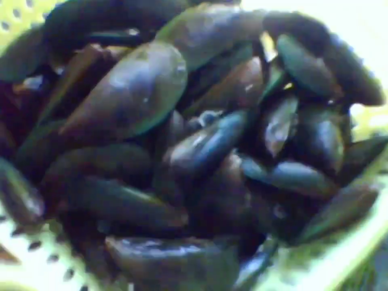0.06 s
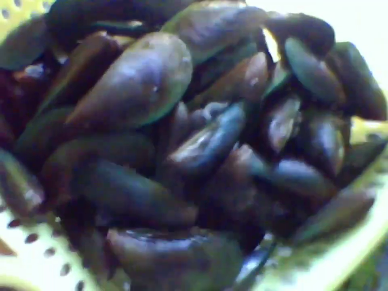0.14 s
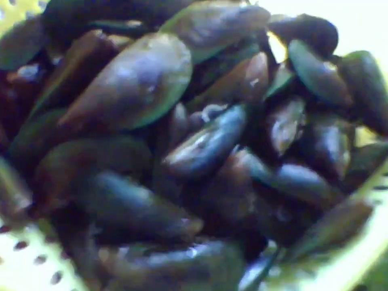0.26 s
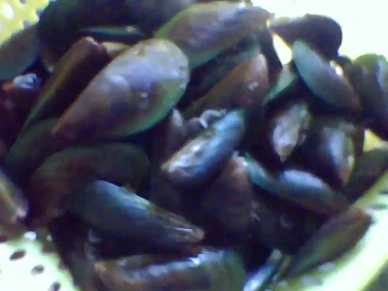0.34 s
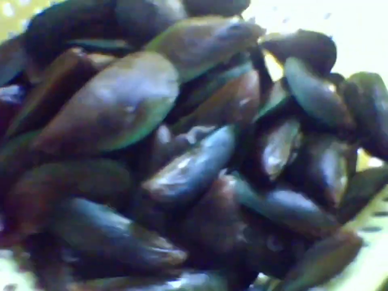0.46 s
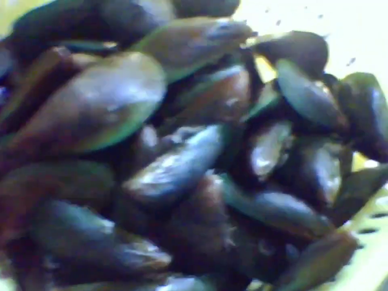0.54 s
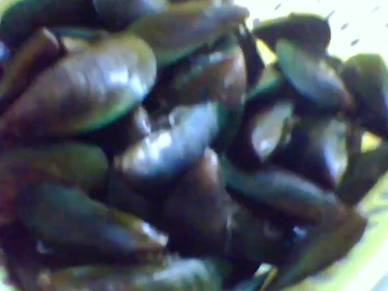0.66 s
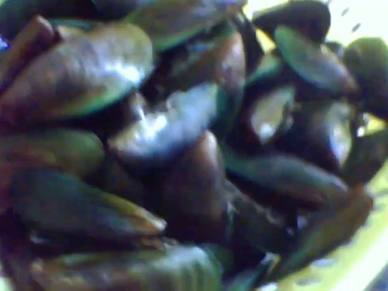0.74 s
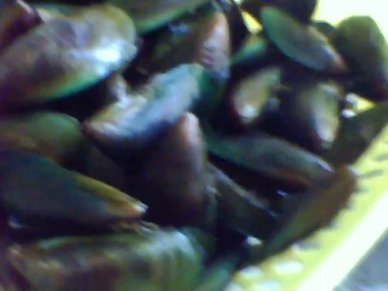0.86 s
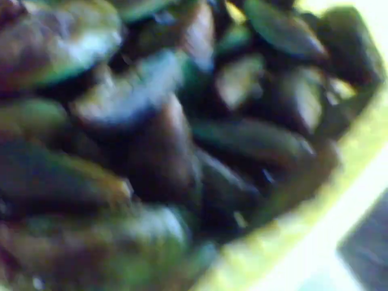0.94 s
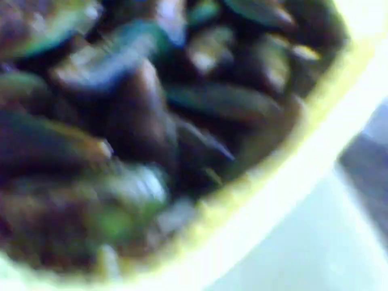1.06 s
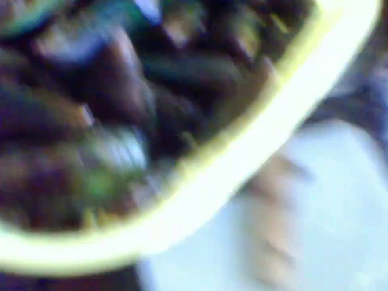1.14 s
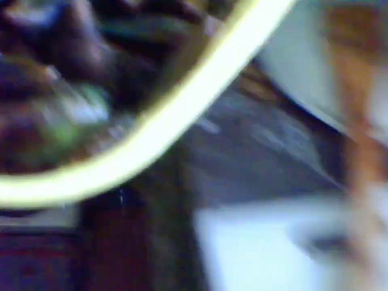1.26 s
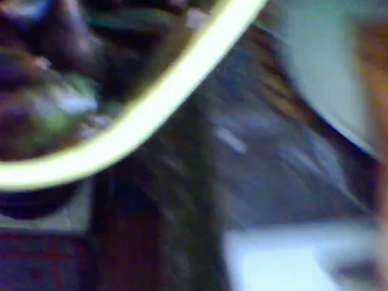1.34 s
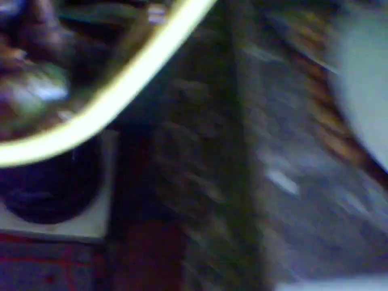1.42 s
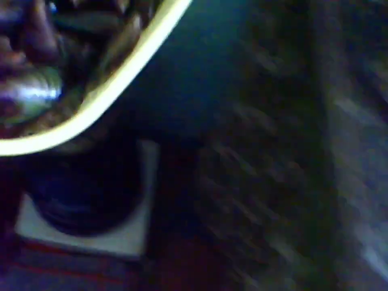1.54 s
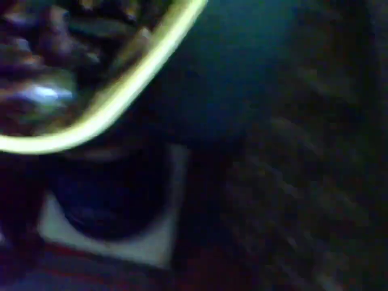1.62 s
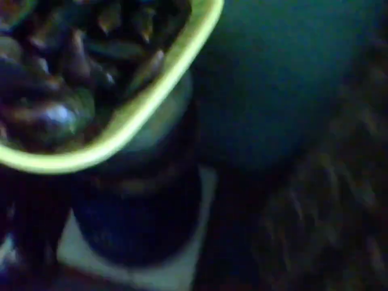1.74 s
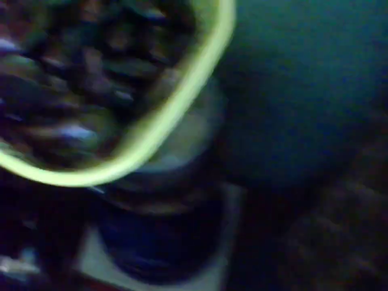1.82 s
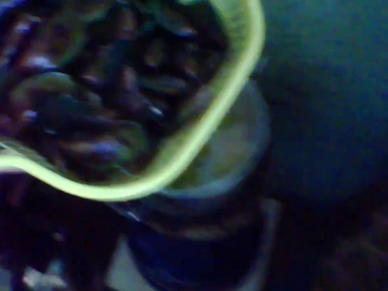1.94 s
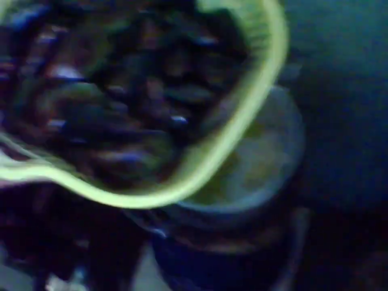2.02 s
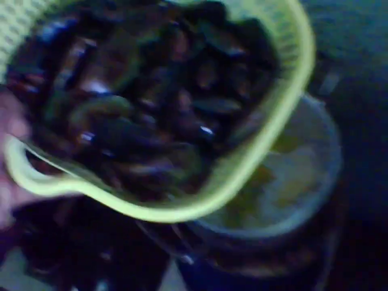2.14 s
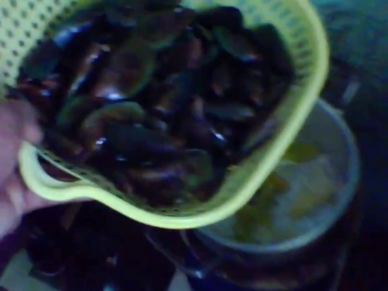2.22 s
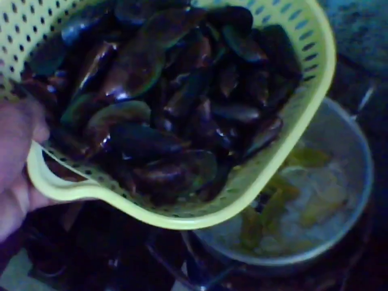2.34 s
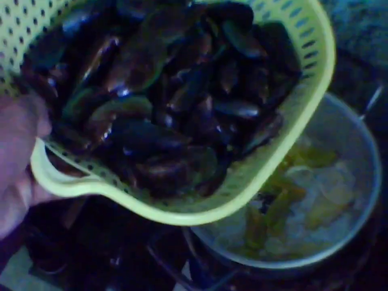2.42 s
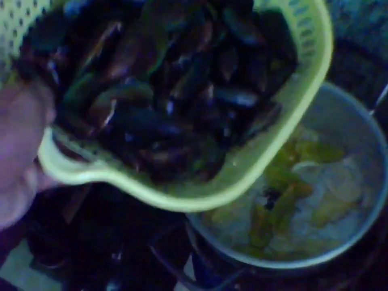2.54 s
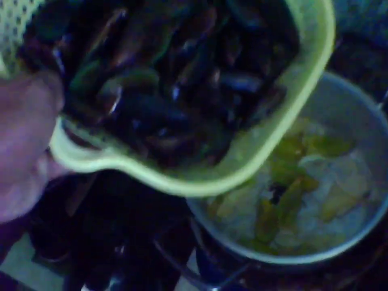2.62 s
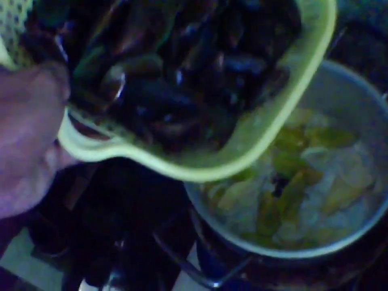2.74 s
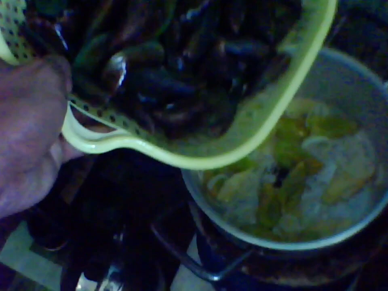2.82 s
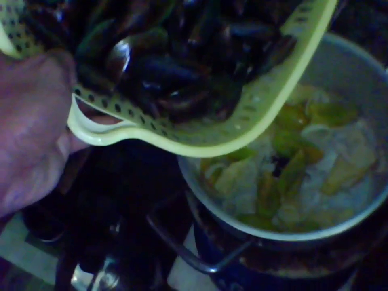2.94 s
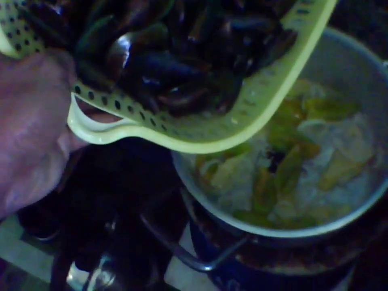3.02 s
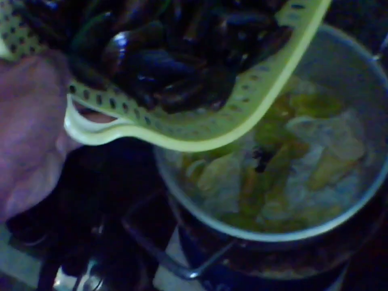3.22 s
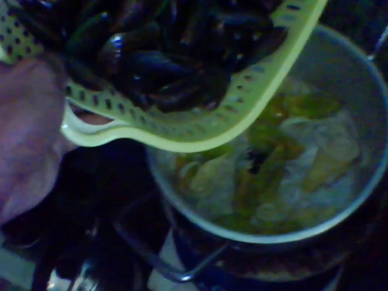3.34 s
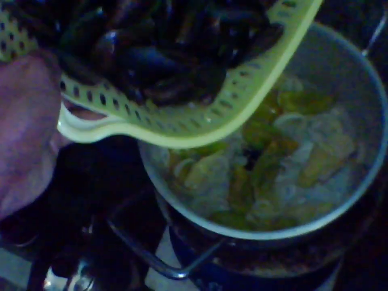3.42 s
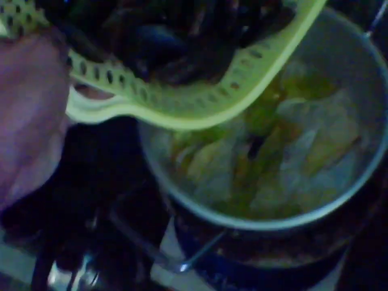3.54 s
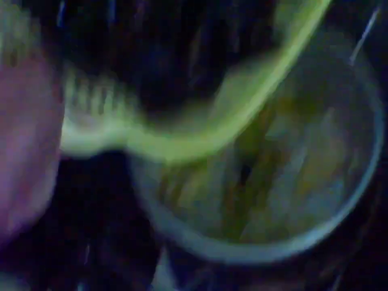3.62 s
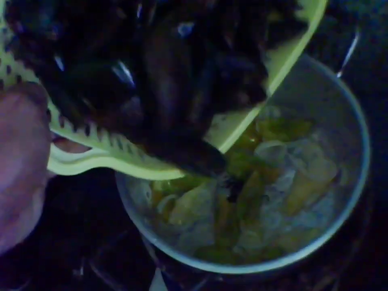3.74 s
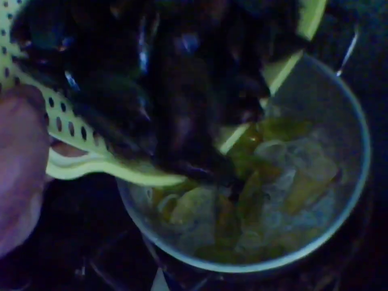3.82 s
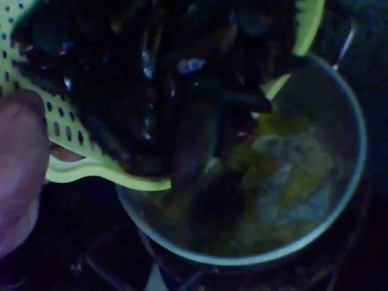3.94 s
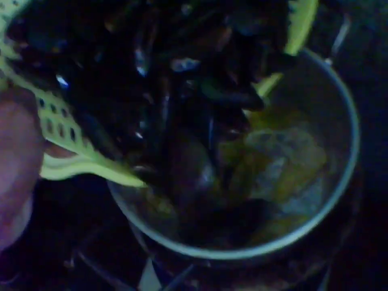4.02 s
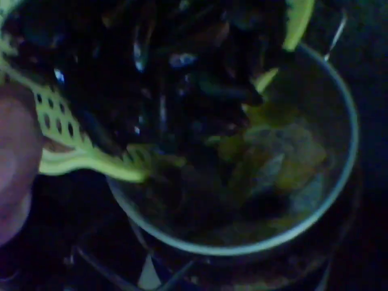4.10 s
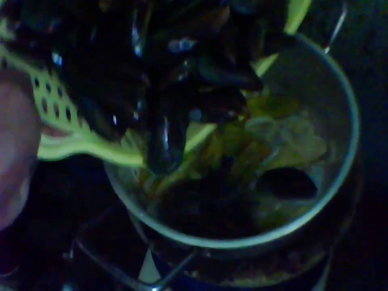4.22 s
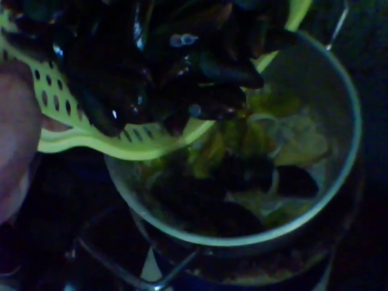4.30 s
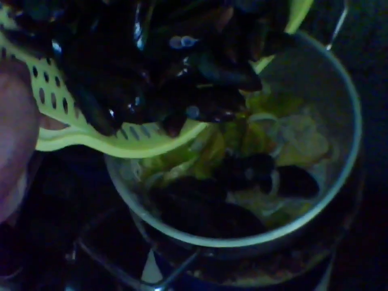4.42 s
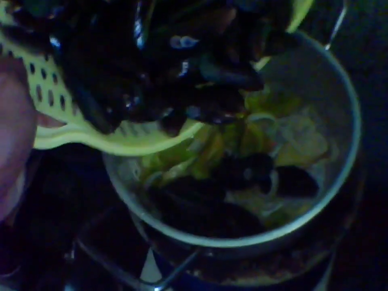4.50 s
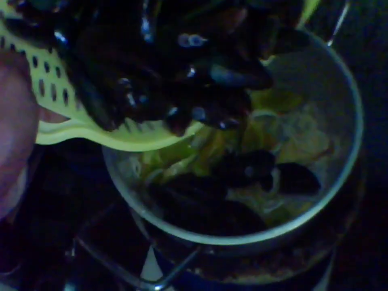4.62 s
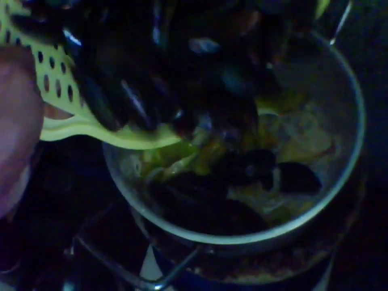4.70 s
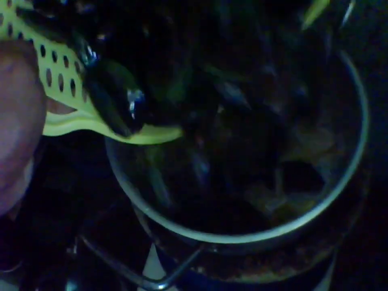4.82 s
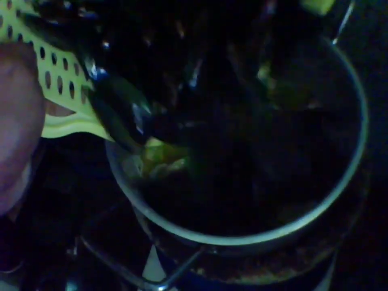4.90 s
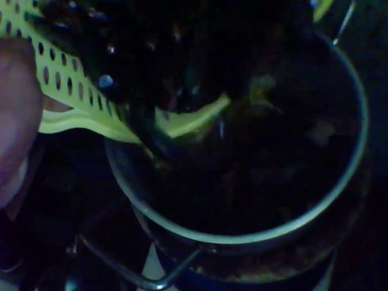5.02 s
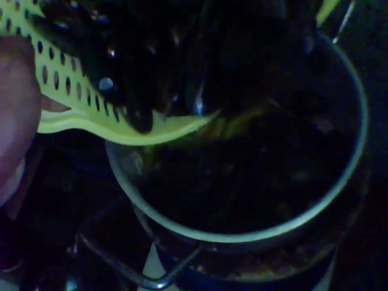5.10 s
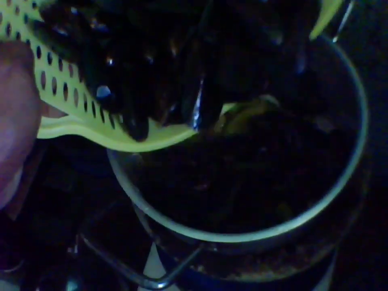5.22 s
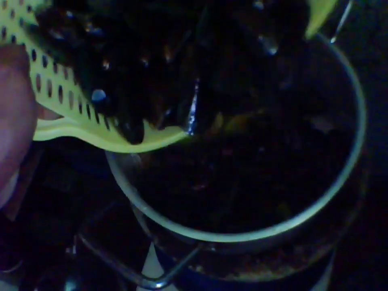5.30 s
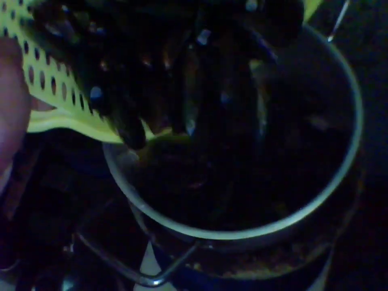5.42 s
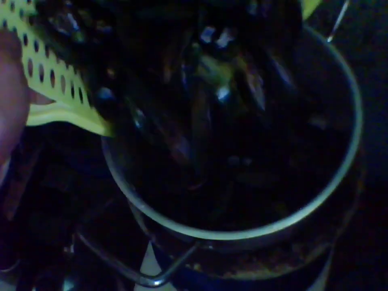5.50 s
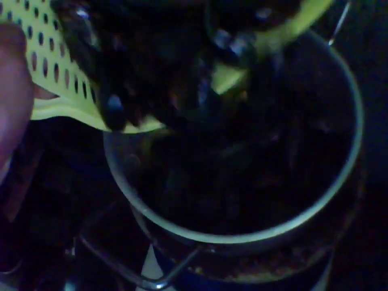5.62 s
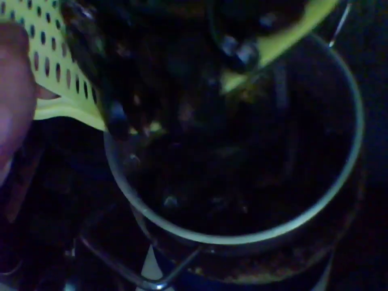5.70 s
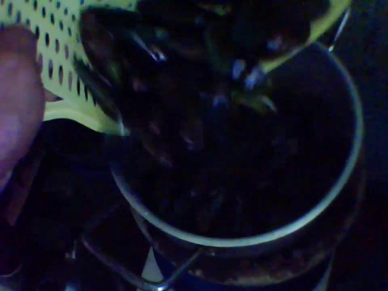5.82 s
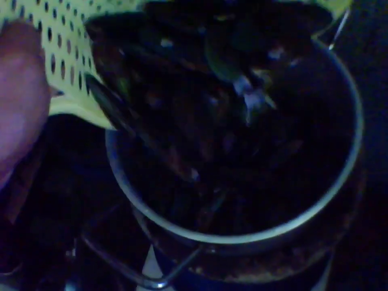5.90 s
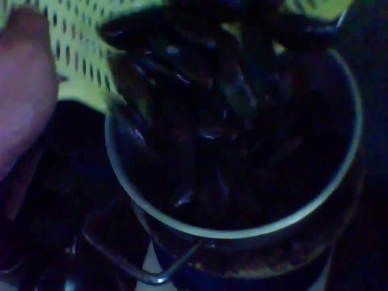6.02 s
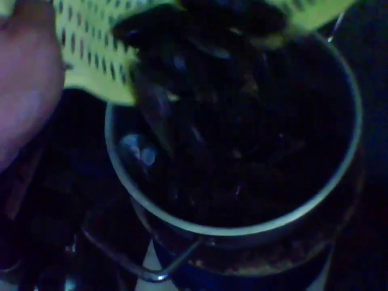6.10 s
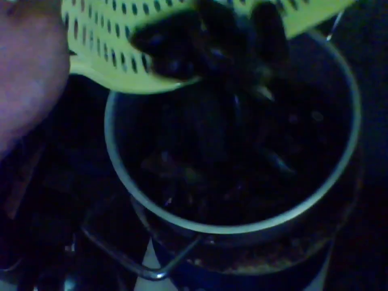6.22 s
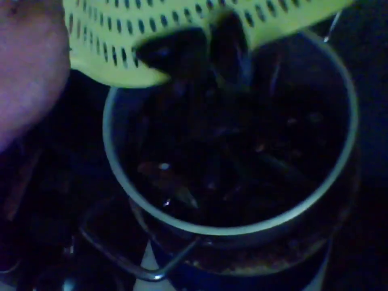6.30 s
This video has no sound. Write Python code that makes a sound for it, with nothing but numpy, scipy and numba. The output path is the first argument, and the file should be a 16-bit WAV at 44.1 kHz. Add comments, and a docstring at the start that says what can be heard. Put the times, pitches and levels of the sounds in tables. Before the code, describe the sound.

A metal pot simmers softly over kitchen room noise and a faint electrical hum. A few mussel shells clack lightly in a plastic colander. The shells then slide out and tumble into the pot, a dense clatter of hollow knocks, dull thuds and sharp clicks, while the bubbling and sizzling grow. The microphone is just above the pot, and the heaviest landings briefly distort.

```python
"""A few mussel shells clack over a simmering metal pot, then the rest slide in from a plastic colander.
Each knock thuds the pot floor, rings its air and wall and cracks in the treble; small shells rattle between.
Underneath, the pot bubbles and sizzles nearer and nearer over kitchen noise and a mains hum.
The microphone is held just above, so the loudest knocks overload the recorder."""
import sys
import numpy as np
from scipy import signal
from scipy.fft import rfft, irfft, next_fast_len
from scipy.io import wavfile
from scipy.ndimage import uniform_filter1d
from numba import njit

SR = 44100
rng = np.random.default_rng(int(sys.argv[2]) if len(sys.argv) > 2 else 0)


def bounce(signal):
    """Save signal as a 16-bit WAV file at the path given by the first command-line argument."""
    frames = np.transpose(np.atleast_2d(signal))
    limited = np.clip(frames, -1, 1)
    pcm = np.round(limited * 32767).astype(np.int16)
    wavfile.write(sys.argv[1], SR, pcm)


N = 280035

# Colour of the room tone. Each row: frequency in Hz, relative level in dB.
KITCHEN_SPECTRUM = [(15, -51.5), (25, -15.5), (128, -6.5), (170, -3), (206, -4.5), (355, -2), (673, -4.5),
                    (1030, -9), (1660, -27.5), (3710, -8.5), (7200, -15.5), (9360, -21), (15800, -120)]
# Fader ride of the mains hum. Each row: time in seconds, level in dB.
HUM_RIDE = [(0, -59), (1.1, -68.5), (2.1, -57.5), (4.5, -57), (5.4, -62.5), (6.35, -62)]
# Partials of the hum. Each row: multiple of HUM_HZ, relative level in dB.
HUM_PARTIALS = [(1, -1), (1.5, -11.5), (3, -12)]
# The simmer as the microphone nears and cold shells hit the pot.
# Each row: time in seconds, bubbling level in dB, sizzle level in dB.
SIMMER_RIDE = [(0, -41.5, -51.5), (.44, -49, -53), (1.3, -50, -55), (1.8, -45.5, -51.5), (2.3, -46, -49.5),
               (2.75, -45, -47.5), (3.4, -46.5, -46), (3.6, -48.5, -48), (3.96, -41, -47),
               (4.2, -39.5, -42), (4.35, -38, -45.5), (4.42, -35.5, -35), (4.8, -38, -38.5),
               (5.1, -27, -31), (5.33, -39.5, -47), (5.44, -36.5, -36.5), (6.35, -30, -37.5)]
# Air in the pot under the simmer. Each row: centre in Hz, width in Hz, relative level in dB.
AIR_BANDS = [(588, 68, 7), (637, 31, 5.5), (752, 64, -3.5), (890, 23.4, 1.5), (980, 78, 2.5),
             (1172, 203, -4.5), (1323, 85, -2.5), (1877, 326, -6), (2480, 336, -9.5)]
# Colour of the sizzle. Each row: centre in Hz, width in Hz, relative level in dB.
SIZZLE_BANDS = [(4060, 840, 15), (5100, 1200, 2), (6140, 1000, -8)]
# What a knock rings: the pot's floor, air and wall, and the shell itself.
# Each row: pitch in Hz, relative level in dB, time to fade 60 dB in seconds.
FLOOR_MODES = [(583.5, 1, 0.056), (622.3, -4.5, 0.091), (682.5, -3, 0.087), (739, -7, 0.098)]
AIR_MODES = [(820.4, 0, 0.05), (986.6, -2.5, 0.076), (1076.6, -7.5, 0.081), (1185.2, 1.5, 0.036),
             (1244, -4.5, 0.041), (1329, -1, 0.031)]
WALL_MODES = [(1635, -8, 0.065), (1766, 5.5, 0.043), (1925, -2.5, 0.012), (2240, -20.5, 0.023),
              (2302, 5.5, 0.026), (2430, 7.5, 0.011), (2640, -5, 0.032)]
SHELL_MODES = [(2870, -8, 0.019), (3260, -4, 0.02), (3685, 5, 0.012), (3988, 6, 0.015), (4295, 3, 0.012),
               (4610, 4.5, 0.0074), (5163, -2.5, 0.015), (5900, -5.5, 0.0064), (6335, -2, 0.0098),
               (6560, -16.5, 0.018)]
# Light ticks of shell tip on shell tip. Each row: start in seconds, level in dB, pitch in Hz.
TIP_TICKS = [(1.628, -28.5, 2200), (2.599, -32, 5600), (3.079, -32, 4680), (3.406, -27, 5100)]
# Dull bumps of the colander and soft landings. Each row: start in seconds, level in dB, pitch in Hz.
SOFT_BUMPS = [(0.234, -33, 288), (0.25, -27, 295), (4.076, -31, 355), (4.102, -24.5, 343),
              (4.214, -25, 330), (4.235, -19, 315), (4.406, -21.5, 340), (5.175, -29.5, 426),
              (5.293, -31, 338), (5.514, -33, 415), (5.583, -17, 424), (5.669, -15.5, 425),
              (6.088, -18.5, 398)]
# Small shells sliding over each other. Each row: time in seconds, base level in dB, base brightness in dB.
RATTLE_RIDE = [(3.55, -60, -17), (3.7, -44, -14), (3.96, -49.5, -36.5), (4.7, -45, -5.5),
               (4.83, -38.5, -11), (4.89, -20, -24), (5.02, -28.5, -21.5), (5.13, -32, -18),
               (5.3, -45, -7.5), (5.4, -44.5, -4.5), (5.539, -45, -5), (5.68, -29, -18), (5.8, -36, -14.5),
               (6.0, -44.5, -8.5), (6.18, -32, -11), (6.35, -38.5, -12)]
# The featured shell knocks. Each row: start in seconds, pot ring level in dB,
# thud and crack in dB against that ring, favoured pitch in Hz.
SHELL_KNOCKS = [(.041, -34, -20, -20, 970), (.103, -28.5, -12, -8, 1130), (.166, -28, -17, -3, 993),
                (.178, -26, -22, -6, 1030), (.251, -33, -19, 3, 980), (2.458, -27, -18, -17, 891),
                (3.174, -22.5, -11, -23, 1000), (3.654, -27, -19, -4, 964), (3.7916, -18, -22, -18, 1170),
                (3.8065, -19, -31, -4.5, 1116), (3.8136, -18, -22, -19, 1040),
                (3.8404, -20.5, -24, -3, 1060), (3.882, -17.5, -22, -13.5, 1150), (3.913, -22, -28, 0, 980),
                (3.9648, -15, -24, -14, 1150), (4.0772, -10.5, -14, -18.5, 1070),
                (4.0955, -11, -15, -21.5, 1010), (4.1798, -25, -6, -6, 1200), (4.2151, -29, -5, -18, 1220),
                (4.2346, -8.5, -1.5, -16, 1330), (4.2523, 0.5, -6.5, -15, 1240),
                (4.2679, -16, -9, -24, 1300), (4.3096, -16.5, -7.5, -14, 1230),
                (4.4064, -21, -2.5, -10.5, 1230), (4.4487, -24.5, -4, -10, 1010),
                (4.5076, -18.5, -18, -16, 1320), (4.5174, -19.5, -4.5, -24, 1320),
                (4.5346, -9, -16, -28, 1300), (4.7506, -24.5, -8, -6, 1290), (4.7754, -25, -6, 0, 1090),
                (4.7955, -21.5, -13, 1, 1320), (4.8376, -20, -25, 2, 1130), (4.8516, 4, -17, -16.5, 980),
                (4.8636, -11, -11, -21, 886), (4.8682, -6, -10, -10, 980), (4.8736, -3, -15, -22, 1250),
                (4.885, 6.5, -21, -10, 1320), (4.8977, 6.5, -9.5, -17, 1140), (4.9207, 6.5, -17, -21, 1180),
                (4.9334, -5, -14, -2, 1130), (4.9444, -7, -6, -19, 1230), (4.9614, -10.5, -14, 1, 867),
                (4.9691, -4, -9, -12.5, 1160), (4.9809, -4, -8, -14, 1260), (5.0034, -4, -14, 0, 1080),
                (5.009, 3.5, -7.5, -19, 1340), (5.0249, 0.5, -13, -12.5, 821),
                (5.0424, -3.5, -12, -25, 904), (5.0693, -9.5, -12, -14, 1280),
                (5.0914, -10.5, -5.5, -10, 1220), (5.1076, -9.5, -7, -10.5, 1270),
                (5.1274, -15.5, -5.5, -19, 1200), (5.1482, -12.5, -5, -13.5, 1190),
                (5.1634, -5.5, -9.5, -13, 1260), (5.1911, -14, -7.5, -19, 1240),
                (5.2382, -14.5, -25, -11, 993), (5.2613, -10.5, -18, -3, 1230),
                (5.2823, -14.5, -6, -16, 1290), (5.2946, -11.5, -2.5, -10, 1190),
                (5.3144, -13, -14, -17, 985), (5.4555, -22.5, -26, -17.5, 1190),
                (5.4965, -12.5, -9.5, -2.5, 960), (5.5143, -17.5, -0.5, -5.5, 1280),
                (5.5264, -16, -14, -14, 969), (5.5725, -8.5, -11, -3.5, 1170), (5.5824, -6.5, -5, -37, 970),
                (5.6304, -13.5, -10, -20, 853), (5.6389, -4, -12, -18, 1180), (5.6623, -7.5, -3, -8, 1210),
                (5.6708, -7, -6.5, 1, 1130), (5.6978, -10.5, -4, -7, 1240), (5.716, -8, -10, -5, 1130),
                (5.7319, -9.5, -23, -9, 834), (5.7492, -8.5, -19, -8.5, 1186),
                (5.7999, -19, -10, -20, 1170), (5.8235, -11, -25, -14, 1120), (5.8597, -18, -6, -17, 1204),
                (5.883, -7, -13, -14, 1120), (5.898, -2, -14.5, -11.5, 1200), (5.9384, -17, -4, -5, 1200),
                (5.9575, -13.5, -11, -9.5, 1170), (6.0159, -15, -10, 1.5, 1210),
                (6.047, -14.5, -16, -16, 1170), (6.086, -4.5, -14, -11, 845),
                (6.136, -10, -12.5, -5.5, 1170), (6.15, -11.5, -24, -9, 956), (6.1794, -15, -8, -15, 1170),
                (6.2163, -16, -4, -13, 960), (6.2506, -12, -12, -13, 1060),
                (6.2758, -10.5, -10.5, -13, 1090), (6.2949, -17, -6, 3.5, 1270)]
# Overloads on the heaviest landings. Each row: start in seconds, length in seconds, level in dB.
OVERLOADS = [(4.8988, 0.0084, -0.5), (4.9273, 0.0106, -3.5), (5.0102, 0.0146, -5)]
GURGLE_TIMES_S = [2.47, 2.62, 2.92, 3.1, 3.4, 3.579]

KITCHEN_DB, HUM_HZ = -49, 120
DEEP_DB, GURGLE_DB, GURGLE_HALF_S = -3.5, 10, 0.054  # deep bubbling against the rest, and its swells
FIRST_LANDING_S, PLASTIC_RING = 4.15, .5  # until then shells hit plastic, which rings shorter than the pot
WALL_DB, WALL_PER_CRACK = -11, 0.51  # a brighter knock rings the wall more
SLIDE_START_S, SLIDE_END_S, SLIDE_PER_S = 3.76, 4.03, 70
SLIDE_DB, SLIDE_THUD_DB, SLIDE_CRACK_DB, SLIDE_HZ = -21.5, -20.5, -12.5, 1100
ROOM_T60_S, ROOM_DB = 0.14, -4.5
PREAMP_LIMIT, CEILING = .93, .97
CONVERTER_HZ, CONVERTER_HISS_DB, TOP_HZ = 6958, -80, 15800


def undb(db):
    """Gain of a dB value."""
    return 10 ** (np.asarray(db) / 20)


def unit(x):
    """Scale to rms 1."""
    return x / np.sqrt(np.mean(x ** 2))


def rides(table):
    """Fader rides: each level column joined by straight lines in time."""
    times, *columns = np.transpose(table)
    return [np.interp(np.arange(N) / SR, times, column) for column in columns]


def band(x, hz, width_hz):
    """Two-pole resonance, gain 1 at the centre."""
    return signal.lfilter(*signal.iirpeak(hz, hz / width_hz, fs=SR), x)


def drift(rate_hz):
    """Smooth random wobble with a spread near 1."""
    hold = int(SR / rate_hz)
    steps = np.repeat(rng.standard_normal(N // hold + 1), hold)
    return 1.3 * uniform_filter1d(uniform_filter1d(steps, hold), hold)[:N]


def kitchen():
    """The bed: steady, dark room tone and a slightly wavering mains hum."""
    hz, db = np.transpose(KITCHEN_SPECTRUM)
    size = next_fast_len(N)
    bin_hz = np.arange(size // 2 + 1) * SR / size + 1
    colour = undb(np.interp(np.log(bin_hz), np.log(hz), db))
    noise = irfft(rfft(rng.standard_normal(size)) * colour, size)[:N]
    room_tone = unit(noise) * undb(KITCHEN_DB + .5 * drift(2.0))
    phase = 2 * np.pi * HUM_HZ * np.arange(N) / SR
    hum = np.sqrt(2) * sum(undb(level) * np.sin(k * phase) for k, level in HUM_PARTIALS)
    return room_tone + hum * undb(rides(HUM_RIDE)[0] + 0.68 * drift(4.17))


def simmer():
    """Bubbling noise in the resonances of the pot, with a sizzle of fine bursts on top."""
    t = np.arange(N) / SR
    bubbling_db, sizzle_db = rides(SIMMER_RIDE)
    air = []
    for hz, width, db in AIR_BANDS:
        gain = undb(db + 2.0 * drift(9.9)) * np.sqrt(width)
        noise = band(rng.standard_normal(N), hz, 1.4 * width)
        air.append(gain * unit(band(noise, hz, 1.4 * width)))
    # the deep bubbling sinks in pitch as the microphone moves
    low_share = np.interp(t, [2.4, 3.3], [.2, .8])
    deep = low_share * air[0] + (1 - low_share) * air[1]
    gurgles = sum(np.exp(-((t - s) / GURGLE_HALF_S) ** 2) for s in GURGLE_TIMES_S)
    bubbling = deep * undb(DEEP_DB + GURGLE_DB * gurgles + 0.78 * drift(13)) + sum(air[2:])
    bursts = rng.standard_normal(N) * undb(2.1 * drift(90))
    sizzle = sum(undb(db + 1.2 * drift(9.2)) * band(bursts, hz, width) for hz, width, db in SIZZLE_BANDS)
    return unit(bubbling) * undb(bubbling_db) + unit(sizzle) * undb(sizzle_db)


def taps(table, t60_s, attack_s):
    """Light blows, each one damped sine: a bump when low, a tick when high."""
    out, t = np.zeros(N), np.arange(N) / SR
    for start, db, hz in table:
        age = np.clip(t - start, 0, None)
        envelope = undb(db - 60 * age / t60_s) * (1 - np.exp(-age / attack_s))
        out += envelope * np.sin(2 * np.pi * hz * age)
    return out


@njit
def strike(onsets, gain, step, phase, decay, attack):
    """Every blow starts each mode as a sine that swells during the contact and then dies away."""
    out = np.zeros(N)
    for blow, onset in enumerate(onsets):
        for mode in range(gain.shape[1]):
            swing = gain[blow, mode] * np.exp(1j * phase[blow, mode])
            pole = decay[blow, mode] * np.exp(1j * step[blow, mode])
            length = int(-6 / np.log(decay[blow, mode]))
            gap = 1.
            for i in range(onset, min(N, onset + length)):
                gap *= attack
                swing *= pole
                out[i] += (1 - gap) ** 2 * swing.imag
    return out


def ring(times, db, modes, scatter_db, contact_s, detune=0.013, phase_spread=1.0):
    """A struck body: each blow shares its force out anew, and the load of shells nudges the pitches."""
    hz, mode_db, t60 = np.transpose(modes)
    chance = rng.standard_normal((len(times), 3, len(hz)))
    gain = undb(db + mode_db + scatter_db * chance[:, 0])
    step = 2 * np.pi * hz * (1 + detune * chance[:, 1]) / SR
    t60 = t60 * np.where(times < FIRST_LANDING_S, PLASTIC_RING, 1)[:, None]
    decay = np.exp(-np.log(1000) / (t60 * SR))
    onsets = (times * SR).astype(np.int64)
    return strike(onsets, gain, step, phase_spread * chance[:, 2], decay, np.exp(-1 / (contact_s * SR)))


def rattle(count=1100):
    """Small shells jostle: many little knocks at random moments, a few poking out of the texture."""
    chance = rng.random((count, 5))
    ride_s, base_db, bright_db = np.transpose(RATTLE_RIDE)
    times = ride_s[0] + chance[:, 0] * (N / SR - ride_s[0])
    db = np.interp(times, ride_s, base_db) - 2.9 * np.log(1 - chance[:, 1])
    thud_db = -15 + 8 * chance[:, 2]
    crack_db = np.interp(times, ride_s, bright_db) + 10 * chance[:, 3]
    hz = 850 + 500 * chance[:, 4]
    return knocks(np.c_[times, db, thud_db, crack_db, hz], scatter_db=5.0)


def slide():
    """Shells skid down the colander: a quick, uneven run of knocks, loudest and brightest midway."""
    beats = np.arange(SLIDE_START_S, SLIDE_END_S, 1 / SLIDE_PER_S)
    chance = rng.standard_normal((len(beats), 3))
    taper = 1 - np.sin(np.pi * (beats - SLIDE_START_S) / (SLIDE_END_S - SLIDE_START_S))
    times = beats + .25 * chance[:, 0] / SLIDE_PER_S
    db = SLIDE_DB - 4 * taper + 1.8 * chance[:, 1]
    crack_db = SLIDE_CRACK_DB - 9 * taper + 2.5 * chance[:, 2]
    columns = np.broadcast_arrays(times, db, SLIDE_THUD_DB, crack_db, SLIDE_HZ)
    return knocks(np.column_stack(columns), scatter_db=3.5)


def knocks(table, scatter_db):
    """Four layers to a knock: the floor's thud, the ring of the air, the wall's clang, the shell's crack."""
    table = np.asarray(table)
    times = table[:, 0]
    db, thud_db, crack_db, hz = table[:, 1:].T[:, :, None]
    # the place of the blow favours the modes near one pitch
    off_pitch_db = -np.minimum(30 * np.abs(np.log(np.array(AIR_MODES)[:, 0] / hz)), 9)
    wall_db = db + WALL_DB + WALL_PER_CRACK * crack_db
    thud = ring(times, db + thud_db, FLOOR_MODES, scatter_db, contact_s=0.00028)
    air = ring(times, db + off_pitch_db, AIR_MODES, scatter_db, contact_s=0.0012)
    wall = ring(times, wall_db, WALL_MODES, scatter_db, contact_s=0.00069, detune=0.032, phase_spread=2.34)
    # rough wet shells meet at many points, so their modes start out of step
    crack = ring(times, db + crack_db, SHELL_MODES, scatter_db,
                 contact_s=0.00064, detune=0.07, phase_spread=3.14)
    return thud + air + wall + crack


def overload():
    """The recorder lurches under the heaviest landings: short bursts of rumble and rasp."""
    t = np.arange(N) / SR
    gate = sum(undb(db) * ((t > start) & (t < start + length)) for start, length, db in OVERLOADS)
    rumble = signal.lfilter(*signal.butter(2, [35, 135], "bandpass", fs=SR), rng.standard_normal(N))
    rasp = band(rng.standard_normal(N), hz=2140, width_hz=2460)
    return (unit(rumble) + undb(0.5) * unit(rasp)) * uniform_filter1d(gate, size=60)


def scene():
    """The mono mix: shells up front with a short room tail, over the simmer and the kitchen."""
    shells = knocks(SHELL_KNOCKS, scatter_db=2.06) + slide() + rattle()
    shells += taps(SOFT_BUMPS, t60_s=0.047, attack_s=.0015)
    shells += taps(TIP_TICKS, t60_s=0.013, attack_s=.0004)
    t = np.arange(SR // 2) / SR
    tail = rng.standard_normal(len(t)) * undb(-60 * t / ROOM_T60_S)
    reverb = signal.fftconvolve(shells, unit(tail) / np.sqrt(len(t)))[:N]
    return (shells + undb(ROOM_DB) * reverb + simmer() + kitchen())[None]


def record(dry):
    """The preamp saturates softly; the converter dulls the top, clips peaks flat and hisses faintly."""
    hot = dry + overload()
    saturated = hot / (1 + np.abs(hot / PREAMP_LIMIT) ** 6) ** (1 / 6)
    dulled = signal.sosfilt(signal.ellip(8, .3, 60, CONVERTER_HZ, fs=SR, output="sos"), saturated)
    clipped = np.clip(dulled, -CEILING, CEILING)
    hiss = undb(CONVERTER_HISS_DB) * rng.standard_normal(N)
    return signal.sosfilt(signal.ellip(8, .2, 70, TOP_HZ, fs=SR, output="sos"), clipped + hiss)


dry = scene()
out = record(dry)
bounce(out)
```